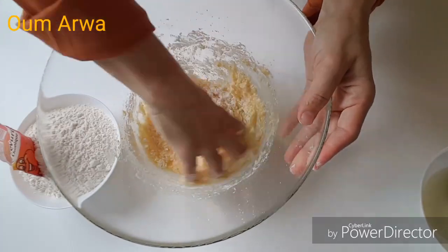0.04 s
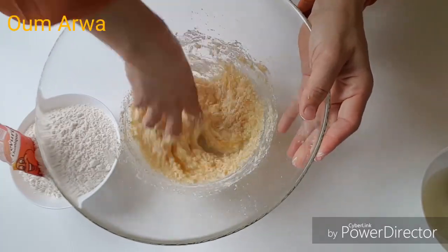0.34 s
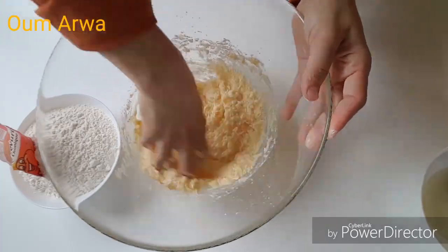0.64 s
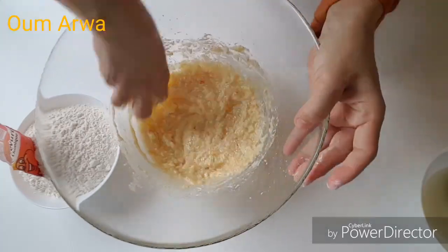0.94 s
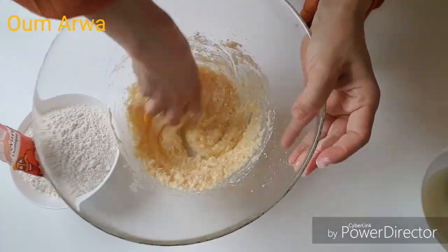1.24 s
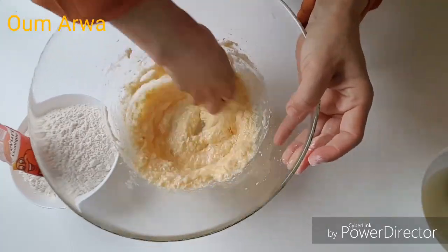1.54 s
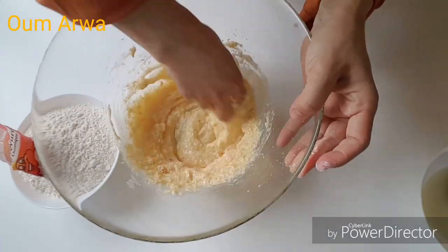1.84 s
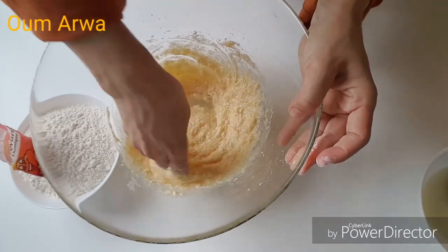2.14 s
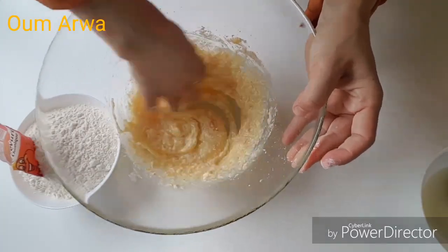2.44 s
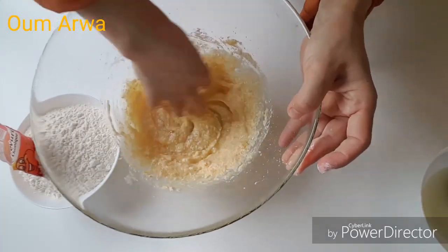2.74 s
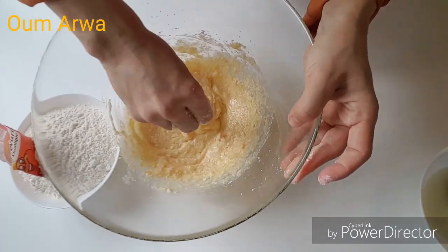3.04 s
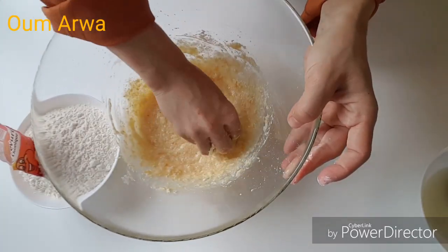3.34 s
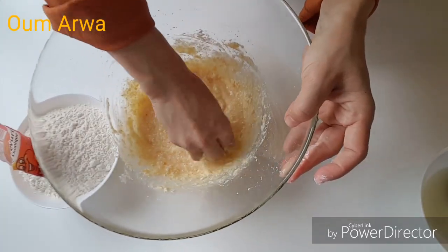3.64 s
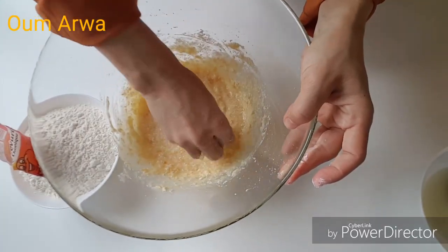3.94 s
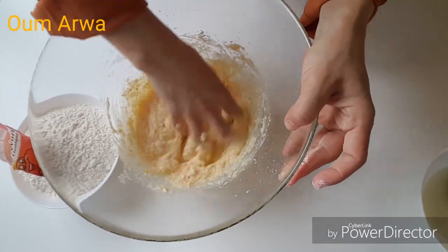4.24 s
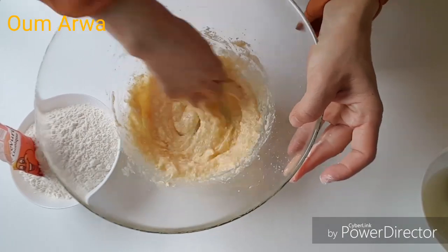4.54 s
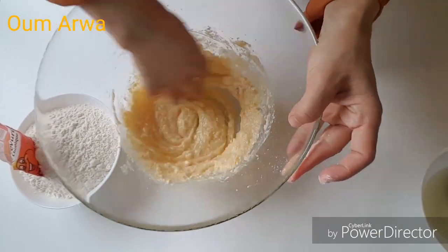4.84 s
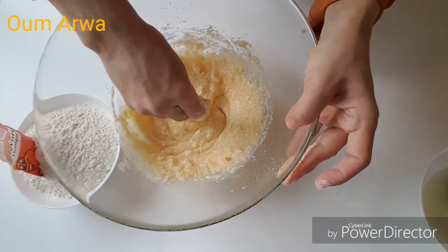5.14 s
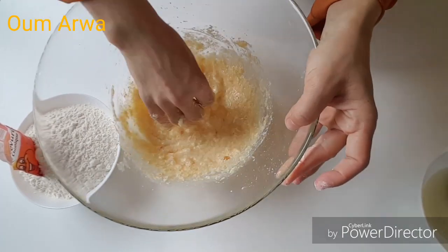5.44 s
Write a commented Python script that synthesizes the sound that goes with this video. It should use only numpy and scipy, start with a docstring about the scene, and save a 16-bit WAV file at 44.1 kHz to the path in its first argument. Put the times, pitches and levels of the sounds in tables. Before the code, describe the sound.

A hand mixes sticky batter in a glass bowl, heard close up in a small kitchen. From the start until about 3 seconds, uneven strokes make soft, dull squelches, low gulps of escaping air, a fine wet crackle and many small smacks and suction pops. Two sharper, louder smacks stand out around 1.7 and 1.8 seconds as the fingers pull free. From 3 to 3.9 seconds the mixing rests, leaving just a few faint wet ticks and one soft squish. At about 3.9, 4.1 and 4.2 seconds the hand knocks the bowl three times: dull, padded thuds with a muffled ring and a low thump from the table. Squelching resumes at once and continues until just after 5 seconds, then settles, with one last wet smack at 5.5 seconds. A faint, low appliance hum and soft room hush continue throughout.

```python
"""A hand works sticky batter round a glass bowl on a kitchen table, close by.
Each stroke squeezes out air with soft gulps, and wet films tear in a fine crackle and sharp smacks.
Most of these sounds are little air pockets that ring for a moment as they open.
In a pause the hand knocks the bowl three times; an appliance hums in the small room."""
import sys
import numpy as np
from scipy import signal
from scipy.fft import rfft, irfft
from scipy.io import wavfile
from scipy.ndimage import uniform_filter1d

SR = 44100
rng = np.random.default_rng(int(sys.argv[2]) if len(sys.argv) > 2 else 0)


def store_pcm(level_fs):
    """Save levels as 16-bit WAV."""
    pcm = np.round(np.clip(level_fs, -1, 1) * 32767).astype(np.int16)
    wavfile.write(sys.argv[1], SR, np.atleast_2d(pcm).T)


N = 246078
T = np.arange(N) / SR  # time in seconds


# tone of the squelching dough: pitch_hz, gain_db
DOUGH_TONE = [(90, -26), (135, -5.5), (170, 11), (230, 8.5), (320, 2.5), (650, -4.5), (1050, -8),
              (1800, -15), (4000, -14.5)]
# tone of the tearing wet films: pitch_hz, gain_db
CRACKLE_TONE = [(400, 0), (1000, -11), (2000, 3), (4000, -3.5), (6000, -8), (8000, -16.5), (11000, -18),
                (15000, -12)]

def stirring(squelch_gain, crackle_gain):
    """Dough folds with dull squelches while thin films peel from the skin."""
    folds = swarm(per_s=800, lo_hz=124.6, hi_hz=1980, cycles=8.1, spread_db=5, most_db=11)
    squelch = unit(colour(folds, DOUGH_TONE))
    ticks = swarm(per_s=330, lo_hz=1000, hi_hz=7000, cycles=6, spread_db=4, most_db=12)
    ticks = band(colour(ticks, CRACKLE_TONE), 600, 7000)
    # the batter smears softly over the glass between the ticks
    smear = colour(noise(N), CRACKLE_TONE) * undb(2 * drift(40) + 7.2 * drift(15))
    crackle = undb(-5.5) * unit(ticks) + undb(-4) * unit(smear)
    return squelch * squelch_gain + crackle * crackle_gain


def push(start_s, length_s, rise_s=0.029, settle_s=0.28):
    """One move of the hand builds quickly, holds, then dies away as the dough settles."""
    rise = np.clip(1 + (T - start_s) / rise_s, 0, 1)
    return rise * fade(np.maximum(T - start_s - length_s, 0), settle_s)


# spells of stirring, with rests between them: start_s, length_s
STIRRING_SPELLS = [(-0.05, 0.88), (0.974, 1.135), (2.301, 0.724), (4.21, 0.78)]

def moving():
    """Power of the stirring: about 1 while the hand moves, 0 at rest."""
    return sum(push(start_s, length_s) ** 2 for start_s, length_s in STIRRING_SPELLS)


# pushes through the dough: start_s, length_s, squelch_db, crackle_db
HAND_STROKES = [(0.0, 0.42, -62.5, -69), (0.512, 0.4, -56, -63.5), (0.727, 0.098, -47, -56),
                (1.028, 0.12, -56, -81), (1.345, 0.089, -48, -59), (1.5, 0.38, -44.5, -57),
                (1.94, 0.11, -52.5, -59), (2.123, 0.012, -48, -54.5), (2.366, 0.19, -48, -57.5),
                (2.574, 0.16, -49, -59), (2.754, 0.22, -50, -63), (3.654, 0.14, -61.5, -80),
                (4.311, 0.23, -50, -63), (4.526, 0.52, -46, -57.5), (4.898, 0.18, -45.5, -56)]

def effort():
    """How strong the squelch and crackle are over time: gentle stirring with the pushes on top."""
    squelch_power = moving() * undb(-60) ** 2
    crackle_power = moving() * undb(-66.5) ** 2
    for start_s, length_s, squelch_db, crackle_db in HAND_STROKES:
        shape = push(start_s, length_s)
        squelch_power += (undb(squelch_db) * shape) ** 2
        crackle_power += (undb(crackle_db) * shape) ** 2
    return np.sqrt(squelch_power), np.sqrt(crackle_power)


# air pockets that burst: start_s, relative_level_db, pitch_hz, relative_snap_db
BURSTING_POCKETS = [(0.2314, -46.5, 2150, -60.5), (0.365, -28, 2270, -46.5), (0.4006, -55, 3980, -48.5),
                    (0.4514, -42, 4840, -57.5), (0.5467, -44, 1200, -59.5), (0.5911, -60, 1630, -54.5),
                    (0.6619, -39, 2270, -65), (0.6754, -43, 2050, -55), (0.7051, -31, 2200, -52.5),
                    (0.738, -32.5, 2180, -70), (0.7450, -29, 5160, -54), (0.7743, -33.5, 3540, -76),
                    (0.795, -34.5, 2430, -71), (0.8235, -29.5, 2380, -45), (0.8305, -48, 1230, -55),
                    (1.0044, -49, 1020, -51), (1.1332, -59, 1230, -53), (1.1776, -56, 1970, -54.5),
                    (1.2735, -40.5, 2060, -62), (1.3127, -31, 4400, -66), (1.3328, -33.5, 3970, -70),
                    (1.3957, -35, 2100, -56.5), (1.444, -38, 1900, -51.5), (1.493, -31, 1080, -48),
                    (1.5125, -31, 1400, -44), (1.5552, -30, 1490, -53.5), (1.6674, -34, 4300, -49.5),
                    (1.6921, -35, 1700, -67), (1.7724, -46, 3880, -54), (1.8063, -27.5, 2360, -55),
                    (1.8497, -32, 1710, -45), (1.92, -29, 1950, -73), (1.9322, -27, 2740, -49),
                    (1.9739, -45, 1240, -59), (2.0438, -36, 4600, -73), (2.116, -38, 2060, -53.5),
                    (2.4225, -31.5, 2060, -45.5), (2.5137, -45, 1230, -59), (2.5705, -33, 4330, -50),
                    (2.5791, -23, 1820, -52), (2.6299, -39, 1150, -51.5), (2.6493, -34, 4100, -49.5),
                    (2.7053, -44, 1950, -61), (2.7268, -31, 1690, -51.5), (2.7435, -35, 3840, -57),
                    (2.7851, -39, 2430, -60), (2.8395, -35.5, 4600, -67), (2.8711, -30.5, 2620, -64),
                    (2.8767, -38, 3630, -53), (2.9004, -36, 1150, -61), (2.9983, -57.5, 1260, -62),
                    (3.3103, -52.5, 1220, -65.5), (3.8009, -44, 2660, -61.5), (4.1895, -44, 1490, -63),
                    (4.3166, -39, 1180, -51), (4.3325, -36, 1400, -70), (4.3836, -28, 1720, -62),
                    (4.3954, -39, 1220, -54.5), (4.5254, -34, 1470, -57), (4.5555, -32, 3200, -57),
                    (4.6233, -27, 990, -48.5), (4.6728, -27, 4200, -48), (4.6867, -28, 1800, -48),
                    (4.7125, -42, 1840, -58), (4.755, -42, 2000, -59), (4.783, -39.5, 4500, -62),
                    (4.7985, -38, 3040, -67), (4.8438, -43, 2070, -53.5), (4.8555, -34, 1980, -58),
                    (4.8848, -31, 1510, -59), (4.9109, -27.5, 1850, -47.5), (4.926, -35, 5270, -66),
                    (4.9508, -22.5, 2100, -46), (4.983, -40, 2500, -49), (5.009, -35, 1590, -45),
                    (5.054, -40, 1170, -49), (5.5374, -30.5, 1290, -39)]
# tone of a snapping film: pitch_hz, gain_db
SNAP_TONE = [(1500, -9), (3500, 2), (5600, -3), (7500, -5), (10500, -6.5), (12500, -9.5), (15500, -7.5)]

def smacks(snap_s=0.0058, spit_s=0.036, delay_s=0.001139):
    """A film rips, the hollow behind it rings, and air spits through the tear near the same pitch."""
    out, t = np.zeros(N), T[:2048]
    for start_s, db, hz, snap_db in BURSTING_POCKETS:
        rip = fade(t, snap_s) * (1 - fade(t, 0.00013))
        snap = unit(colour(noise(len(t)) * rip, SNAP_TONE))
        spit = peak(band(noise(len(t)) * fade(t, spit_s), 0.81 * hz, min(1.7 * hz, 6800)))
        # small, high hollows ring for more cycles
        ring = peak(pocket(hz, cycles=5 + 0.006 * hz, glide=0.1))
        add(out, start_s + delay_s, undb(db - 3) * ring)
        add(out, start_s + delay_s, undb(db - 9.5) * spit + undb(snap_db - 8) * snap)
    return out


# fingers breaking free of the batter: start_s, relative_hollow_db, pitch_hz, relative_crack_db
FINGER_PULLS = [(1.6516, -15.5, 1180, -16), (1.797, -20, 1530, -11.5)]
# tone of the breaking seal: pitch_hz, gain_db
CRACK_TONE = [(900, 4), (2200, 4.5), (3500, -5), (5800, -4), (7300, 7), (8500, 2), (10500, 6.5), (11700, 3),
              (14500, -7), (15500, -17.5)]

def pulls(hollow_s=0.014, crack_s=0.0012):
    """The seal breaks with one hard crack, and air slaps into the wide wet hollow behind it."""
    out, t = np.zeros(N), T[:2048]
    for start_s, hollow_db, hz, crack_db in FINGER_PULLS:
        tear = undb(-15) * noise(len(t)) * fade(t, crack_s)
        tear[0] = 1  # a sharp click leads the spray
        add(out, start_s, undb(crack_db) * peak(colour(tear, CRACK_TONE)))
        add(out, start_s, undb(hollow_db - 13) * peak(pocket(hz, cycles=0.6, glide=-0.3)))
        add(out, start_s, undb(hollow_db - 1.5) * puff(hollow_s, 0.58 * hz, 2.28 * hz))
    return out


# suction letting go under a finger: start_s, relative_level_db, pitch_hz
SUCTION_POPS = [(0.11, -38, 634), (0.503, -36.5, 570), (0.516, -36, 1020), (0.589, -45, 757),
                (0.997, -43, 760), (1.349, -30.5, 686), (1.938, -21.5, 1000), (2.021, -42.5, 585),
                (2.2119, -33, 660), (2.637, -31, 940), (4.291, -38, 1200), (4.4814, -26.5, 970),
                (4.619, -32, 960), (4.908, -25.5, 840), (5.049, -35.5, 1010)]

def sucks(tick_s=0.0016, hiss_s=0.07):
    """A wet edge parts with a tick; air rushes into the hollow, whose pitch rises as it opens."""
    out = np.zeros(N)
    for start_s, db, hz in SUCTION_POPS:
        add(out, start_s, undb(db - 9) * puff(tick_s, hz, 4 * hz, order=1))
        add(out, start_s, undb(db - 6.5) * puff(hiss_s, 0.36 * hz, 1.46 * hz))
        add(out, start_s + 0.00117, undb(db - 2) * peak(pocket(hz, cycles=3.4, glide=0.12)))
    return out


# air squeezed from under the fingers: start_s, relative_air_db, air_hz, relative_dough_db, dough_hz
AIR_GULPS = [(0.586, -36.5, 350, -41, 217), (0.744, -34, 493, -34, 227), (0.768, -42, 443, -39, 227),
             (0.858, -36, 604, -57, 263), (0.996, -36, 454, -62, 238), (1.111, -35.5, 456, -41.5, 268),
             (1.353, -34, 417, -35, 231), (1.44, -37, 400, -37.5, 222), (1.496, -31.5, 430, -49, 233),
             (1.592, -52, 447, -37, 230), (1.664, -32, 626, -38, 210), (1.718, -23, 520, -30.5, 242),
             (1.778, -39, 470, -35, 229), (1.86, -33.5, 686, -43, 223), (2.138, -36, 432, -40, 315),
             (2.16, -42, 423, -42.5, 301), (2.381, -33.5, 543, -37, 250), (2.404, -29, 525, -30.5, 252),
             (2.493, -32, 386, -35, 203), (2.65, -32, 387, -45, 247), (2.941, -33.5, 447, -36.5, 200),
             (3.705, -44.5, 346, -46.5, 255), (4.333, -52, 450, -36.5, 207), (4.39, -38, 600, -34, 222),
             (4.535, -38.5, 666, -36.5, 221), (4.622, -40, 428, -50, 232), (4.688, -34, 455, -37.5, 218),
             (4.818, -39.5, 450, -38, 268), (4.908, -35, 452, -48, 226), (4.97, -30, 400, -30, 234),
             (4.992, -40, 420, -36.5, 256)]

def gulps(count=7, sputter_s=0.026, heave_s=0.0063, sag_per_s=0.79):
    """Air sputters out in a string of sliding blips while the mass of dough heaves and sags."""
    out, t = np.zeros(N), T[:4096]
    for start_s, air_db, hz, dough_db, dough_hz in AIR_GULPS:
        blips = np.zeros(len(t))
        for k, (when, pitch, size, slide) in enumerate(rng.random((count, 4))):
            along = (k + when) / count
            blip = pocket(hz * 2 ** (1.1 * (pitch - 0.5)), cycles=5.9, glide=slide - 0.5)
            blip_db = 0.71 * size - 7.5 * abs(along - 0.3)  # swells early, then fades
            add(blips, sputter_s * along, (-1) ** k * undb(blip_db) * blip)
        heave = np.sin(2 * np.pi * dough_hz * t * (1 - sag_per_s * t)) * t * np.exp(-t / heave_s)
        rush = puff(0.12, 0.58 * hz, 1.75 * hz) * (1 - fade(t, 0.043))
        add(out, start_s, undb(air_db - 3) * peak(blips) + undb(air_db - 10) * peak(rush))
        add(out, start_s, undb(dough_db) * peak(heave))
    return out


def fizz():
    """The tiniest bubbles prickle whenever the hand moves, however hard it works."""
    prickle = swarm(per_s=600, lo_hz=4000, hi_hz=16000, cycles=2.5, spread_db=4, most_db=13)
    return undb(-70.5 + 3 * drift(13)) * unit(prickle) * np.sqrt(moving())


# ringing notes of the full bowl on its table: pitch_hz, gain_db, fade_s
BOWL_NOTES = [(129, 3, 0.15), (152, 4.5, 0.18), (212, 3, 0.1), (248, -1, 0.16), (398, -4, 0.054),
              (597, -28, 0.056), (654, -19, 0.04), (890, -4, 0.097), (1046, -13, 0.09), (1218, -15, 0.091)]
# knocks of the hand on the bowl, with relative levels:
# start_s, thud_db, thud_hz, ring_db, slap_db, slap_hz, thump_db, tick_db
BOWL_KNOCKS = [(3.9488, -25, 227, -32, -29, 784, -32, -38.5),
               (4.079, -23.5, 159, -30.5, -32.5, 517, -28, -34.5),
               (4.2027, -35, 202, -38, -30, 640, -39, -38.5)]

def knocks(delay_s=0.00071, table_hz=80.5):
    """A padded blow lands as a dull thud; the batter hushes the glass and the table thumps below."""
    out, t = np.zeros(N), T[:SR // 2]
    ring = sum((-1) ** k * undb(db) * note(t, hz, fade_s)
               for k, (hz, db, fade_s) in enumerate(BOWL_NOTES))
    thump = note(t, table_hz, fade_s=0.33) * (1 - fade(t, 0.028))
    press = 1 - fade(t, 0.003)  # the soft hand takes a moment to press home
    for start_s, thud_db, thud_hz, ring_db, slap_db, slap_hz, thump_db, tick_db in BOWL_KNOCKS:
        thud = note(t, thud_hz, fade_s=0.045)
        slap = band(noise(len(t)) * fade(t, 0.025), 0.4 * slap_hz, 1.28 * slap_hz)
        tick = band(noise(len(t)) * fade(t, 0.021), 1900, 2630, order=1)
        parts = (thud_db, thud), (ring_db, ring), (slap_db, slap), (tick_db, tick), (thump_db, thump)
        add(out, start_s + delay_s, press * sum(undb(db) * peak(part) for db, part in parts))
    return out


def table_rumble(squelch_gain, shudder_s=1.33, rest_db=-81):
    """The table top rumbles under the working hand and shudders after each knock."""
    shudder = sum(undb(thump_db - 21.5) * (T > start_s) * fade(np.maximum(T - start_s, 0), shudder_s)
                  for start_s, *_, thump_db, _ in BOWL_KNOCKS)
    lean = undb(-38) * squelch_gain ** 0.53  # grows more slowly than the squelch
    middle, side = (unit(band(noise(N), 68.6, 93.2)) for _ in range(2))
    return stereo(middle, undb(-13) * side) * np.sqrt(lean ** 2 + shudder ** 2 + undb(rest_db) ** 2)


# notes at which the kitchen itself rings: pitch_hz, gain_db, fade_s
ROOM_NOTES = [(119, -37, 0.84), (191.7, -6.5, 0.25), (219.1, 8.5, 0.42), (265.3, 6.5, 0.44),
              (311.4, 2, 0.25), (372.4, 8, 0.36), (459.7, 6, 0.13), (590.5, 1, 0.42), (638, 5.5, 0.11),
              (692, 7, 0.17), (965.5, 5, 0.083), (1040, 5, 0.09), (1230, 2, 0.17)]

def kitchen(sound, places=5, circle_s=0.55):
    """The room rings, and echoes from the bowl and walls change as the hand circles."""
    t = T[:SR // 3]
    ringing = 0
    for hz, db, fade_s in ROOM_NOTES:
        gain = undb(db) * 2 * np.log(1000) / (fade_s * SR)  # a longer ring builds up no louder
        ringing += gain * np.cos(2 * np.pi * hz * t) * fade(t, fade_s)
    out = np.array([sound, sound])
    place = T / circle_s * places
    for k in range(places):
        nearness = np.maximum(1 - np.abs((place - k + 1) % places - 1), 0)
        bowl = echoes(db=-8, fade_s=0.022, start_s=0.0001, top_hz=16000)
        walls = echoes(db=-10.5, fade_s=0.26, start_s=0.005, top_hz=8500)
        out += signal.oaconvolve((sound * nearness)[None], ringing + bowl + walls, axes=1)[:, :N]
    # the bowl is slightly to the left, so the right side hears it one sample later
    return np.array([out[0], np.roll(out[1], 1)])


def echoes(db, fade_s, start_s, top_hz):
    """A dense tail of echoes; left and right differ most in the treble."""
    t = T[:SR // 3]
    shape = fade(t, fade_s) * (t > start_s)
    middle, side = noise((2, len(t))) * undb(db) * shape / np.linalg.norm(shape)
    side = undb(5.5) * band(side, 3600, 19500, order=1) + undb(-1) * side
    return band(stereo(middle, side), 200, top_hz, order=1)


# steady tones of the appliance: pitch_hz, level_db
HUM_TONES = [(161, -77), (167.6, -64), (179.7, -72.5), (191.8, -64.5), (199.2, -61.5), (218, -58.5),
             (226.1, -68.5), (243, -77.5), (344, -78), (349, -75.5), (373, -77.5), (732.5, -79.5)]

def appliance_hum():
    """Tones close in pitch waver and throb against each other."""
    hum = np.zeros(N)
    for hz, db in HUM_TONES:
        phase = 2 * np.pi * (hz * T + rng.random()) + 0.15 * hz / 200 * drift(3)
        hum += undb(db + 1.8 * drift(4.15)) * np.sqrt(2) * np.sin(phase)
    return hum


# tone of the air in the room: pitch_hz, gain_db
AIR_TONE = [(20, -9), (45, -34), (80, -43), (130, 0), (170, -2.5), (240, -5.5), (370, -11.5), (520, -17.5),
            (900, -21), (2000, -27), (5000, -33), (14000, -42), (16000, -37)]

def room_air():
    """A faint, even hush, wider in the treble."""
    middle, side = (colour(noise(N), AIR_TONE) for _ in range(2))
    gain = undb(-74) / np.std(band(middle, 350, 16000))
    side = band(side, 1100, 21000, order=1) + undb(-9) * side
    return gain * stereo(middle, side)


def pocket(hz, cycles, glide):
    """An air pocket rings for a few cycles; its pitch slides as it opens."""
    life_s = cycles / hz
    t = T[:int(life_s * SR) + 2]
    return np.sin(2 * np.pi * hz * t * (1 + glide * t / (2 * life_s))) * fade(t, life_s)


def swarm(per_s, lo_hz, hi_hz, cycles, spread_db, most_db):
    """Countless small pockets open at random moments: many faint, a few strong."""
    out = np.zeros(N)
    for when, pitch, size, life, slide in rng.random((int(per_s * N / SR), 5)):
        hz = lo_hz * (hi_hz / lo_hz) ** pitch
        db = min(-spread_db * np.log(1 - size), most_db)
        ring = pocket(hz, cycles * (0.5 + life), glide=slide - 0.5)
        add(out, when * N / SR, np.sign(slide - 0.5) * undb(db) * hz * ring)
    return out


def puff(fade_s, lo_hz, hi_hz, order=2):
    """A short rush of air through a gap, peak 1."""
    t = T[:4096]
    return peak(band(noise(len(t)) * fade(t, fade_s), lo_hz, hi_hz, order))


def note(t, hz, fade_s):
    """A pure tone that dies away."""
    return np.sin(2 * np.pi * hz * t) * fade(t, fade_s)


def fade(t, fade_s):
    """Die away by 60 dB every fade_s seconds."""
    return np.exp(-np.log(1000) * t / fade_s)


def noise(size):
    """Plain white hiss."""
    return rng.standard_normal(size)


def drift(per_s):
    """A smooth random wander, about 1 in size."""
    hold = int(SR / per_s)
    steps = np.repeat(noise(N // hold + 1), hold)
    return unit(uniform_filter1d(uniform_filter1d(steps, hold), hold)[:N])


def band(x, lo_hz, hi_hz, order=2):
    """Keep the pitches between lo_hz and hi_hz."""
    edges_hz = [lo_hz, min(hi_hz, SR / 2 - 100)]
    return signal.sosfilt(signal.butter(order, edges_hz, "band", fs=SR, output="sos"), x)


def colour(x, tone, size=4096):
    """Turn pitches up or down along a table of pitch_hz, gain_db."""
    hz, db = np.transpose(tone)
    grid_hz = np.maximum(np.fft.rfftfreq(size, 1 / SR), 1)
    gains = undb(np.interp(np.log(grid_hz), np.log(hz), db))
    # fold the filter forward in time so that nothing rings ahead of a click
    folded = irfft(np.log(gains))
    folded[1:size // 2] *= 2
    folded[size // 2 + 1:] = 0
    return signal.fftconvolve(x, irfft(np.exp(rfft(folded))))[:len(x)]


def undb(db):
    """Turn decibels into a gain."""
    return 10 ** (np.asarray(db) / 20)


def unit(x):
    """Scale to an average power of 1."""
    return x / np.sqrt(np.mean(x ** 2))


def peak(x):
    """Scale to a peak of 1."""
    return x / np.abs(x).max()


def stereo(middle, side):
    """Left is middle plus side; right is middle minus side."""
    return middle + side * np.array([[1], [-1]])


def add(out, start_s, x):
    """Mix x into out from start_s on."""
    i = max(int(start_s * SR), 0)
    out[i:i + len(x)] += x[:max(len(out) - i, 0)]


def scene():
    """The bowl in its kitchen; small air pockets give off no deep bass."""
    squelch_gain, crackle_gain = effort()
    pops = smacks() + pulls() + sucks() + gulps()
    batter = band(stirring(squelch_gain, crackle_gain) + fizz() + pops, 87, 16000)
    bowl = undb(-3) * (batter + band(knocks(), 94, 24000, order=4))
    return kitchen(bowl) + table_rumble(squelch_gain) + appliance_hum() + room_air()


def record(dry, balance_db=-0.3, top_hz=15450):
    """Make the left side a touch quieter than the right and cut the highest treble steeply."""
    balance = undb(stereo(0, balance_db / 2))
    return signal.sosfilt(signal.ellip(8, 0.2, 70, top_hz, fs=SR, output="sos"), balance * dry)


dry = scene()
out = record(dry)
store_pcm(out)
```